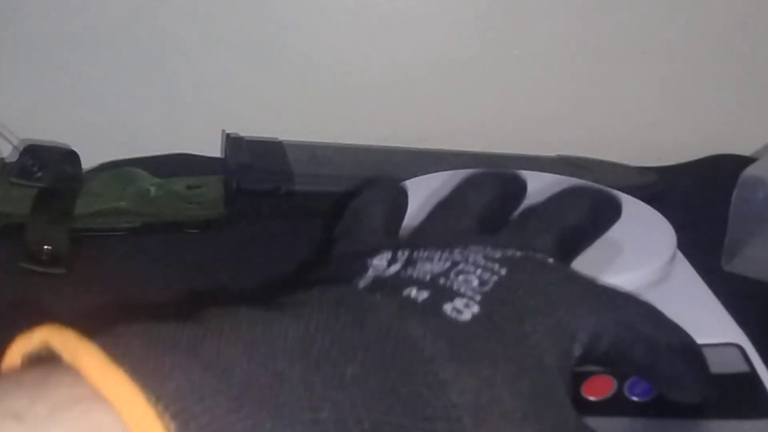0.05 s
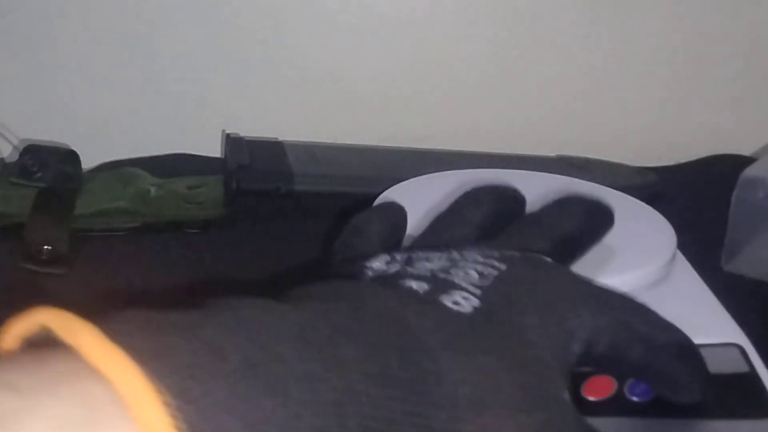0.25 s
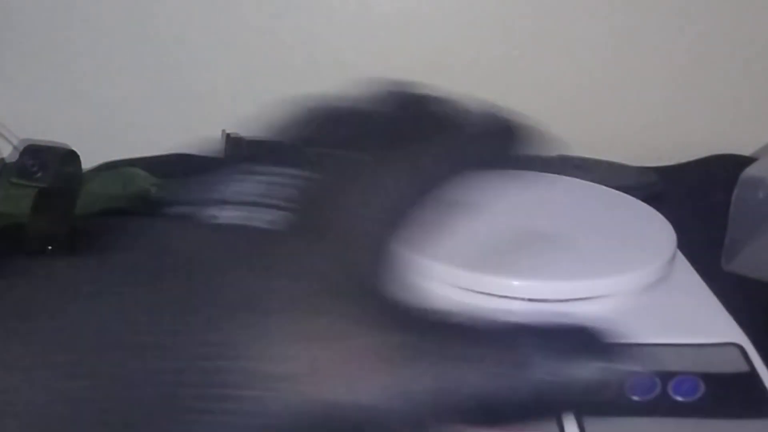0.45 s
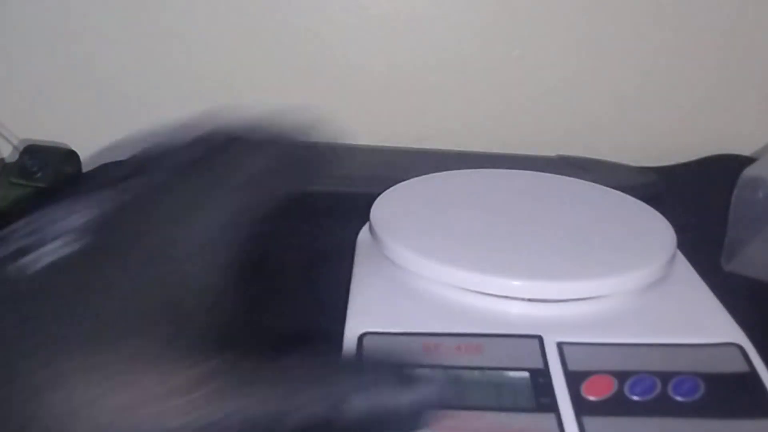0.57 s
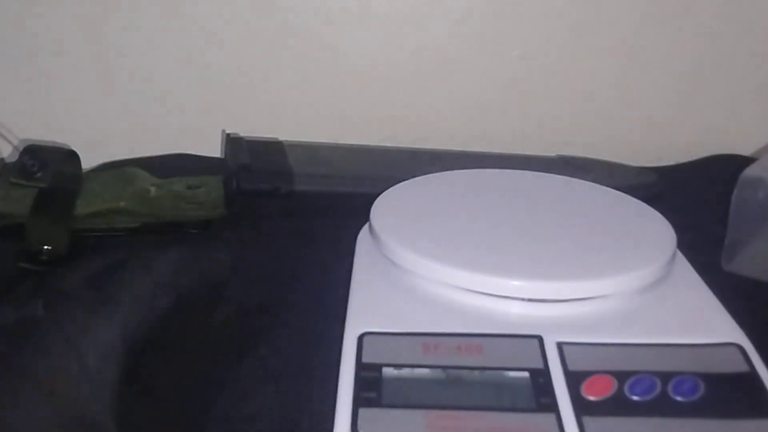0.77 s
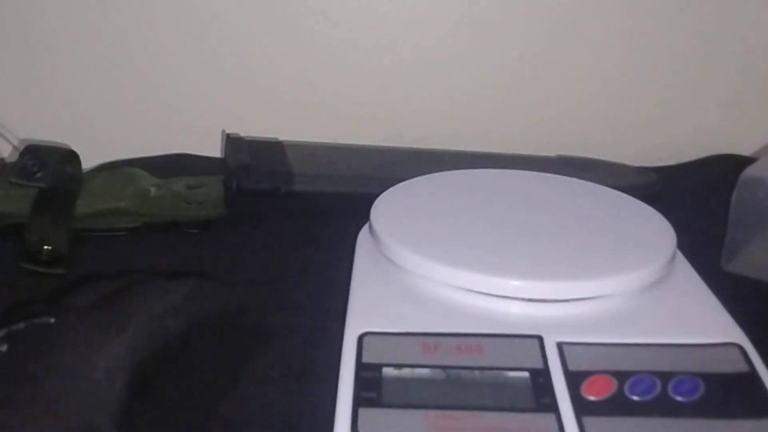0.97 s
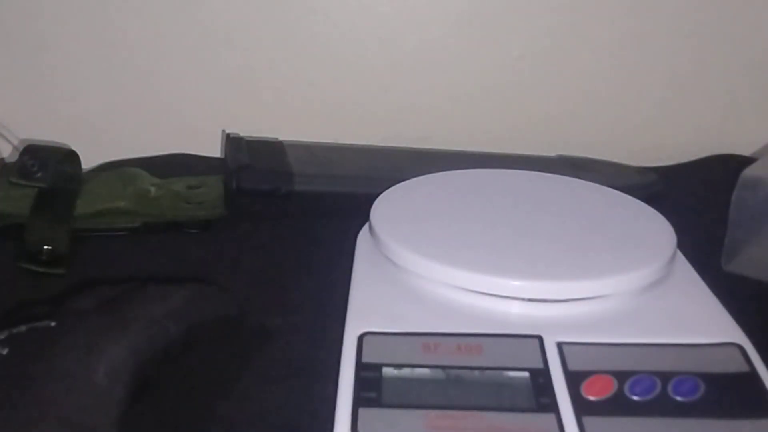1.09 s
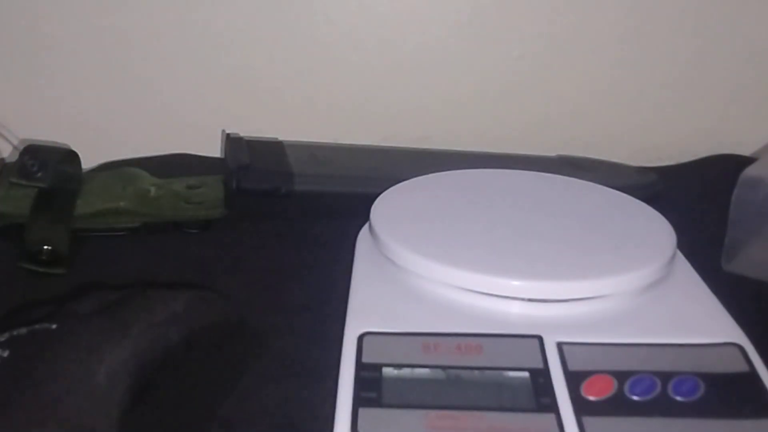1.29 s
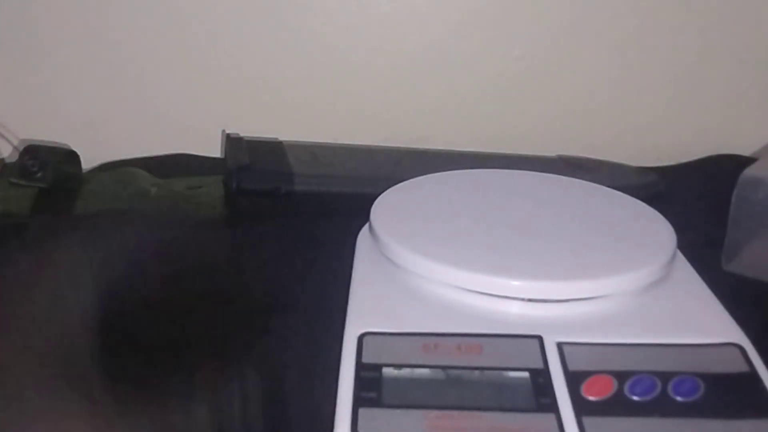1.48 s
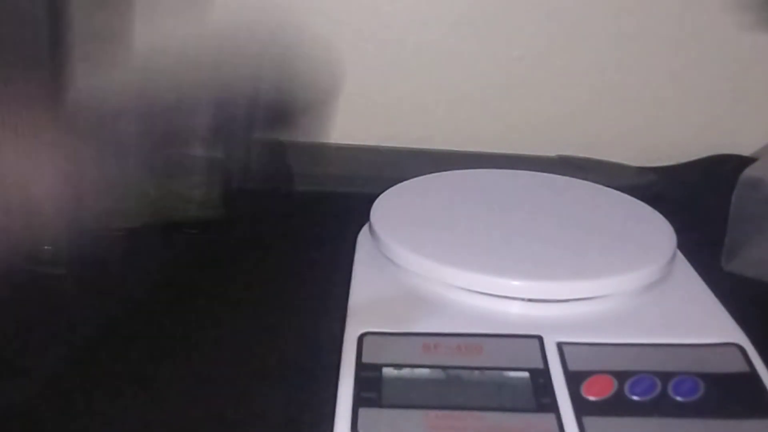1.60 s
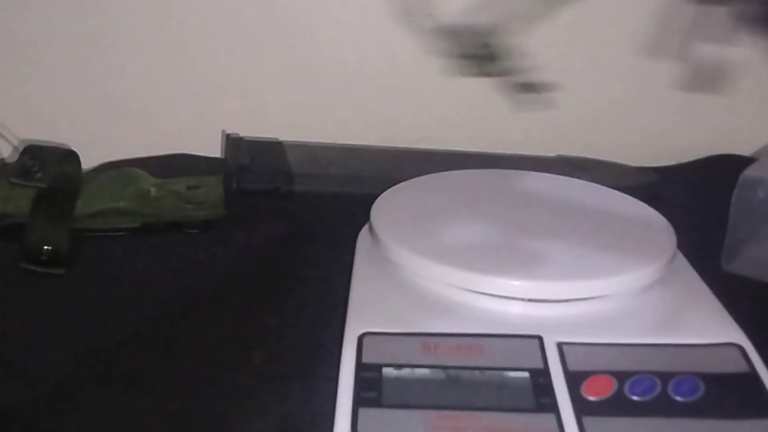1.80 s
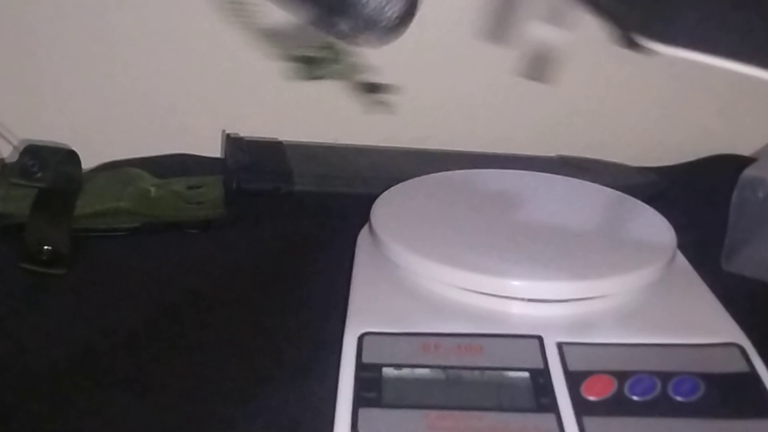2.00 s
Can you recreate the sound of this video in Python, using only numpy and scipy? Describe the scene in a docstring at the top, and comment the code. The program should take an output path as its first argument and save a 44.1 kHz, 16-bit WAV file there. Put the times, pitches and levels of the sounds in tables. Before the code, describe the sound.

Two sharp, close clicks come from the button of a plastic kitchen scale. Low hum and hiss fill the small room afterward, with barely audible glove swishes on cloth and a faint knock as a knife is picked up.

```python
"""A low hum, rumble, hiss and two thin, wavering whines fill a small, quiet room, with two soft thuds.
A gloved thumb presses and releases the button of a plastic kitchen scale: two sharp clicks,
each a snap that kicks the case, leaves it ringing and rattles the button in its seat.
Later the glove brushes over cloth and a knife is lifted with a faint knock."""
import sys
import numpy as np
from scipy import signal
from scipy.fft import rfft, irfft, next_fast_len
from scipy.io import wavfile
from scipy.ndimage import map_coordinates

SR = 44100
rng = np.random.default_rng(int(sys.argv[2]) if len(sys.argv) > 2 else 0)


def digitize_waveform(pressure):
    """Quantize a signal to 16-bit integers and store it at the path in sys.argv[1].

    Rows of a 2-D input are taken as channels; values are limited to [-1, 1].
    """
    field = np.atleast_2d(pressure).T
    bounded = np.clip(field, -1, 1)
    quanta = np.round(bounded * 32767).astype(np.int16)
    wavfile.write(sys.argv[1], SR, quanta)


N = 90404


def amp(db):
    """Decibels to gain."""
    return 10 ** (np.asarray(db) / 20)


def unit(x):
    """Scale to rms 1."""
    return x / np.sqrt(np.mean(x ** 2) + 1e-20)


def since(start_s):
    """Seconds since start_s, zero before it."""
    return np.maximum(np.arange(N) / SR - start_s, 0)


def decay(t, t60_s):
    """Exponential fall, 60 dB in t60_s."""
    return np.exp(-np.log(1000) * t / t60_s)


def along(points, hz):
    """Read (Hz, value) points on a log axis."""
    f, values = np.transpose(points)
    return np.interp(np.log(hz + 1), np.log(f + 1), values)


def filtered(x, response):
    """Apply a complex frequency response."""
    size = next_fast_len(N + SR // 2)
    return irfft(rfft(x, size) * response(np.fft.rfftfreq(size, 1 / SR)), size)[:N]


def delay(f, delay_s):
    """Response of a pure delay."""
    return np.exp(-2j * np.pi * f * delay_s)


def minimum_phase(gain):
    """Quickest causal response with this gain."""
    cepstrum = irfft(np.log(np.maximum(gain, 1e-6)))
    half = len(cepstrum) // 2
    cepstrum[1:half] *= 2
    cepstrum[half + 1:] = 0
    return np.exp(rfft(cepstrum))


def noise(spectrum):
    """Coloured noise, rms 1."""
    return unit(filtered(rng.standard_normal(N), lambda f: amp(along(spectrum, f))))


def wobble(rate_hz):
    """Smooth random curve, rate_hz knots a second."""
    return map_coordinates(rng.standard_normal(N // 100), [np.arange(N) * rate_hz / SR], mode="wrap")


def tone(hz, db, waver_db, drift_hz, rate_hz):
    """Sine with wandering pitch and level."""
    phase = 2 * np.pi * np.cumsum(hz + drift_hz * wobble(rate_hz)) / SR
    return amp(db) * unit(np.sin(phase) * amp(waver_db * wobble(rate_hz / 2)))


# Hum lines: f/Hz, level/dB, drift/Hz
HUM_LINES = [(119, -60, 1.6), (262, -75, 7.84), (598, -76.5, 1.8), (2869, -85.5, 4)]

def hum():
    """Continuous, slightly unsteady tones."""
    return sum(tone(hz, db, waver_db=2.0, drift_hz=drift, rate_hz=30) for hz, db, drift in HUM_LINES)


# Whine envelopes: t/s, level/dB
LOW_WHINE_LEVELS = [(0, -76.5), (0.601, -67), (.75, -68), (.85, -79), (1.08, -73), (1.13, -60.5),
                    (1.17, -79), (1.42, -75), (1.52, -69), (1.62, -65), (1.67, -70), (1.76, -64.5),
                    (1.82, -89), (1.92, -91), (1.96, -60.5), (2.05, -64.5)]
HIGH_WHINE_LEVELS = [(0, -73), (.15, -84.5), (.8, -86), (.9, -77), (1.05, -91), (1.4, -78), (1.55, -92),
                     (1.76, -73), (1.9, -84), (2.05, -81)]

def whines():
    """Two thin tones that come and go."""
    low_db = np.interp(since(0), *np.transpose(LOW_WHINE_LEVELS))
    high_db = np.interp(since(0), *np.transpose(HIGH_WHINE_LEVELS))
    low = tone(hz=1041, db=low_db, waver_db=2.5, drift_hz=10.1, rate_hz=160)
    high = tone(hz=2530, db=high_db, waver_db=-0.8, drift_hz=3, rate_hz=40)
    return low + high


# Noise spectra: f/Hz, relative density/dB
HISS_SPECTRUM = [(88, -50.5), (150, -6.5), (239, -4.5), (421, -10), (607, -12.5), (792, -14.5), (1050, -9),
                 (1390, -12.5), (1570, -18.5), (2500, -21), (2710, -23), (6890, -23.5), (8000, -26),
                 (10400, -57), (17600, -120)]
RUMBLE_SPECTRUM = [(4, 3.5), (12, 1), (25, -0.5), (42, -21), (62, -9), (85, -22.5), (150, -22), (300, -77),
                   (900, -95.5)]

def hiss_and_rumble():
    """Steady noise floor of the room."""
    return amp(-62.5) * noise(HISS_SPECTRUM) + amp(-49.5) * noise(RUMBLE_SPECTRUM)


# Thuds: t/s, level/dB
THUDS = [(0.031, -46.5), (1.10, -44.5)]

def thuds(hz=45, rise_s=0.012):
    """Soft, low pulses that swell and die within a few cycles."""
    pulse = lambda t: t / rise_s * np.exp(1 - t / rise_s) * np.sin(2 * np.pi * hz * t)
    return sum(amp(db) * pulse(since(start_s)) for start_s, db in THUDS)


# Plastic case resonances: f/Hz, width/Hz, level/dB
CASE_RESONANCES = [(263, 196, -12.5), (448, 110, -12), (751, 147, -0.5), (905, 100, -3), (1170, 96, -1),
                   (1490, 210, 0), (1780, 76, -6.5), (2180, 310, -11)]

def case_kick(start_s, pitch, rebound_s, rebound_db, contact_hz=2026, kick_db=22.5):
    """A band-limited impulse and its rebound excite the case."""
    def response(f):
        power = sum(np.abs(amp(db) * f * width / ((hz * pitch) ** 2 - f * f + 1j * f * width)) ** 2
                    for hz, width, db in CASE_RESONANCES)
        contact = signal.freqs(*signal.butter(6, contact_hz, analog=True), worN=f)[1]
        rebound = 1 + amp(rebound_db) * delay(f, rebound_s)
        return minimum_phase(np.sqrt(power)) * contact * rebound * delay(f, start_s)

    return amp(kick_db) * filtered(np.ones(1), response)


# Ringing modes: f/Hz, level/dB, T60/s
RING_MODES = [(132.2, -45.5, 0.47), (156.3, -36, 0.24), (343.8, -42, 0.26), (420.7, -36.5, .16),
              (732, -36, 0.21), (862, -45, 0.14), (1015, -36, 0.35), (1117, -37.5, 0.14),
              (1430, -44.5, 0.12), (1535, -42, .18)]

def case_ring(t):
    """Modes that ring on after a snap."""
    return sum(amp(db) * decay(t, t60_s) * np.sin(2 * np.pi * hz * t) for hz, db, t60_s in RING_MODES)


def rattle(t, spectrum, rise_s=0.00097):
    """The button chatters briefly in its seat."""
    return amp(-22) * noise(spectrum) * (1 - np.exp(-t / rise_s)) * decay(t, t60_s=0.02)


# Press, release: t/s, level/dB, direction, case pitch ratio, rebound delay/s, rebound level/dB
BUTTON_SNAPS = [(.2227, -1, 1, 1.01, 0.002993, -14), (.3955, -3.5, -1, 1.039, 0.001805, -13)]
# Chatter spectra: f/Hz, relative level/dB
PRESS_SPECTRUM = [(300, -27.5), (1500, -10.5), (2200, 0.5), (2900, 5), (3200, 2.5), (3550, -5.5),
                  (4200, -3.5), (4750, 0.5), (5300, -0.5), (5900, -5), (6350, -11.5), (7000, -2.5),
                  (7600, -11.5), (8200, -20.5)]
RELEASE_SPECTRUM = [(300, -35.5), (1500, -3), (2300, 6.5), (2850, -0.5), (3300, 0), (3900, -3.5),
                    (4600, -7.5), (5200, -0.5), (5700, -13), (6500, -9.5), (7400, -7.5), (8200, -26)]

def button(scatter_paths=4, scatter_db=-0.5):
    """The button snaps in, then out; its chatter differs on each path into the room."""
    clicks = np.zeros(N)
    for snap, spectrum in zip(BUTTON_SNAPS, (PRESS_SPECTRUM, RELEASE_SPECTRUM)):
        start_s, db, direction, pitch, rebound_s, rebound_db = snap
        t = since(start_s)
        kick = case_kick(start_s, pitch, rebound_s, rebound_db)
        scattered = sum(room_tail(rattle(t, spectrum)) for _ in range(scatter_paths))
        scattered *= amp(scatter_db) / np.sqrt(scatter_paths)
        near = with_echoes(kick + rattle(t, spectrum))
        clicks += amp(db) * direction * (near + room_tail(kick) + scattered + case_ring(t))
    return clicks


# Early reflections: delay/s, level/dB, extra treble/dB
REFLECTIONS = [(.0029, -15.5, 4), (.0068, -22.5, -1), (.0102, -16.5, -3), (0.0144, -15, 9.5),
               (.0160, -16.5, 4.5)]

def with_echoes(x, treble_hz=3000):
    """Direct sound plus echoes off the table and near walls."""
    def response(f):
        shelf = f ** 4 / (f ** 4 + treble_hz ** 4)
        return sum(amp(db + treble_db * shelf) * delay(f, lag_s) for lag_s, db, treble_db in REFLECTIONS)

    return x + filtered(x, response)


# Room decay: f/Hz, T60/s
ROOM_DECAY = [(100, 0.6), (300, 0.27), (900, 0.33), (1700, 0.48), (2700, 0.42), (5000, 0.34), (8000, 0.36)]
# Room colour: f/Hz, level/dB
ROOM_SPECTRUM = [(100, 11), (300, -1), (700, 1.5), (1500, -8.5), (3000, -3), (5000, -1.5), (8000, -1)]

def room_tail(x, wet_db=-3.5, onset_s=0.0022, build_s=0.0021):
    """Diffuse reverberation; each frequency dies at its own rate."""
    hz, t, bins = signal.stft(rng.standard_normal(SR * 3 // 4), SR, nperseg=256)
    bins = bins * decay(t, along(ROOM_DECAY, hz)[:, None])
    tail = signal.istft(bins, SR, nperseg=256)[1]
    tail *= 1 - np.exp(-since(onset_s)[:len(tail)] / build_s)
    wet = signal.fftconvolve(x, tail / np.linalg.norm(tail))[:N]
    return filtered(wet, lambda f: amp(wet_db + along(ROOM_SPECTRUM, f)))


# Glove strokes: peak t/s, rise/s, fall/s, level/dB
GLOVE_STROKES = [(.88, 0.02, .04, -67), (1.545, .04, 0.029, -68.5), (1.57, 0.013, 0.01, -59)]
# Cloth friction: f/Hz, relative level/dB
CLOTH_SPECTRUM = [(200, -4), (800, -4), (1800, 4), (2500, -3), (3500, -2), (4600, 2.5), (5300, -7),
                  (6100, -1), (7500, 1.5), (8200, -30)]

def glove(grain_db=3.4):
    """The glove brushes cloth in short, grainy swishes."""
    t = since(0)
    envelope = sum(amp(db) * np.exp(-np.abs(t - peak_s) / np.where(t < peak_s, rise_s, fall_s))
                   for peak_s, rise_s, fall_s, db in GLOVE_STROKES)
    friction = noise(CLOTH_SPECTRUM) * amp(grain_db * wobble(rate_hz=300))
    return envelope * unit(friction)


# Knock modes: f/Hz, relative level/dB
KNIFE_MODES = [(340, 0), (600, -2), (880, 6), (1120, 6.5), (1400, -20), (3650, -7)]

def knife(start_s=2.008, rise_s=0.0041):
    """A faint, damped knock as the knife is lifted."""
    t = since(start_s)
    modes = sum(amp(db) * np.sin(2 * np.pi * hz * t) for hz, db in KNIFE_MODES)
    knock = amp(-51.5) * modes * (1 - np.exp(-t / rise_s)) * decay(t, t60_s=0.05)
    return with_echoes(knock) + room_tail(knock)


def scene():
    """Mono mix, heard beside the scale."""
    handling = button() + glove() + knife()
    background = hum() + whines() + hiss_and_rumble() + thuds()
    return (handling + background)[None]


def record(dry):
    """Steep low-pass."""
    cutoff_hz = 7900
    return filtered(dry[0], lambda f: 1 / np.sqrt(1 + (f / cutoff_hz) ** 90))[None]


dry = scene()
out = record(dry)
digitize_waveform(out)
```